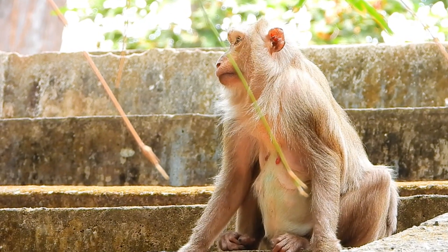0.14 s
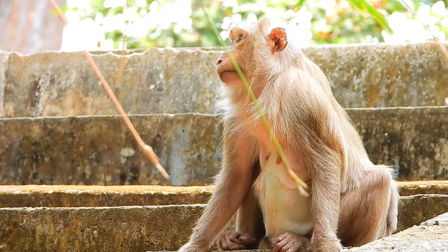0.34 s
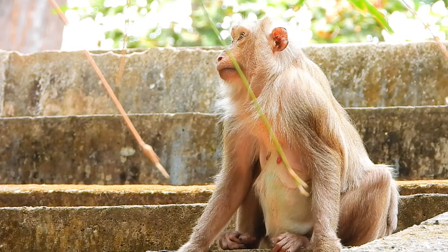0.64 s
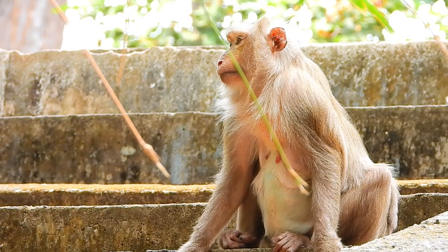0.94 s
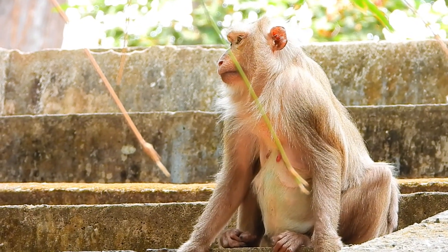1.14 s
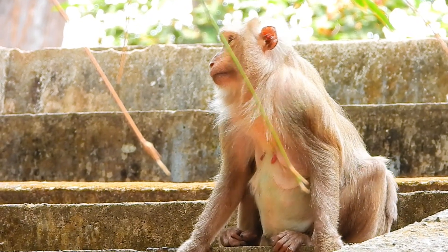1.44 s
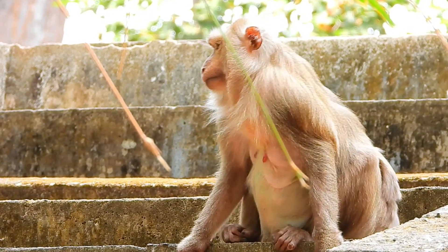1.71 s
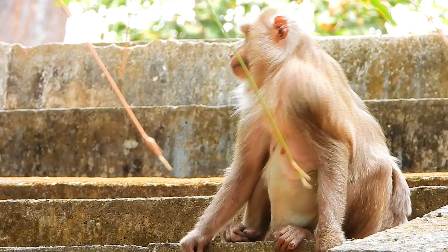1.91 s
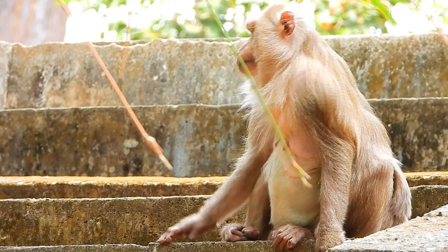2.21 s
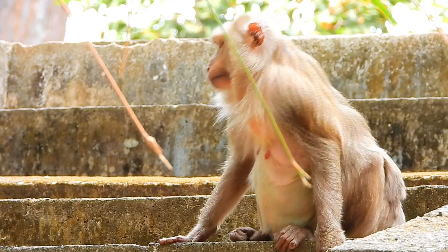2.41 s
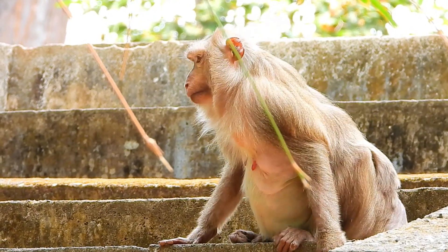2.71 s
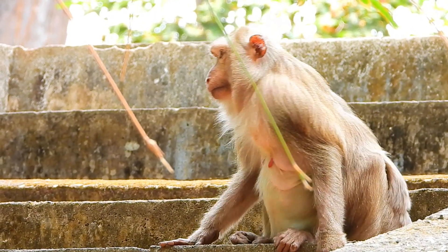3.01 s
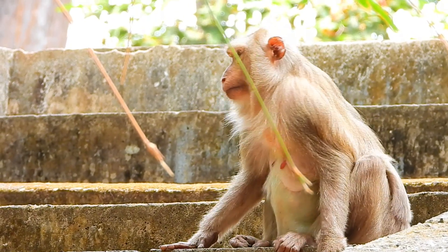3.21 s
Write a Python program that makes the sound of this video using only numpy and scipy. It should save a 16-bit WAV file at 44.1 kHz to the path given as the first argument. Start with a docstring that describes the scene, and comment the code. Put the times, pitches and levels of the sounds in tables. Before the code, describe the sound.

A dense cicada chorus drones steadily from 0 to about 3.35 seconds, already going at the start and cut off without an ending. Far insects merge into a wide, bright hiss; nearer ones buzz and flicker in quick small swells, smeared by foliage. A closer, drier rasp stays right. Underneath lie a faint outdoor wash and a very weak, wavering low hum that slowly fades. The monkey is silent.

```python
"""A dense chorus of cicadas drones in trees: flickering near voices, a fine rasp to the right, a broad hiss.
The nearer insects click their tymbals a few hundred times a second into ringing abdomens, smeared by foliage.
The closest is a regular, unsmeared click train; countless far insects are shaped, diffuse noise.
Beneath lie a faint outdoor wash of noise and a low, wavering hum of narrow noise bands."""
import sys
import numpy as np
from scipy import signal
from scipy.fft import rfft, irfft, next_fast_len
from scipy.io import wavfile
from scipy.ndimage import uniform_filter1d

SR = 44100
rng = np.random.default_rng(int(sys.argv[2]) if len(sys.argv) > 2 else 0)


def dump(signal):
    """Clip the signal to [-1, 1] and save it as 16-bit WAV at the path in sys.argv[1]."""
    limited = np.clip(np.atleast_2d(signal).T, -1, 1)
    pcm = np.round(limited * 32767).astype(np.int16)
    wavfile.write(sys.argv[1], SR, pcm)


N = 147735

# Body resonances of the nearer cicadas. Each row: centre in Hz, width in Hz (between -9 dB points),
# relative level in dB, left-right likeness from 0 to 1.
BODY_RINGS = [(1621, 330, -43.5, 0.96), (1758, 203, -37, 0.84), (1950, 190, -45, 0.74),
              (3149, 495, -35.5, 1), (3333, 310, -31.5, 0.48), (3493, 360, -30, 0.7), (3705, 300, -35.5, 1),
              (4264, 800, -34.5, 0.26), (5110, 940, -33, 0.23)]
# Limits between the low, main and high bands of those resonances, in Hz.
BAND_LIMITS_HZ = (2500, 3900)
# Swell of the main band. Each row: time in seconds, relative level in dB.
MAIN_SWELL = [(0.0, -28), (0.13, -26), (0.16, -31), (0.19, -25.5), (0.32, -28.5), (0.34, -23.5),
              (0.44, -29), (0.46, -23.5), (0.5, -28.5), (0.54, -25.5), (0.69, -28), (0.77, -25.5),
              (1.36, -26.5), (1.54, -25.5), (1.56, -29.5), (1.63, -24.5), (1.66, -28), (1.67, -21),
              (1.75, -27.5), (1.77, -24), (1.79, -26), (1.86, -23), (1.88, -30), (1.91, -24), (1.94, -29),
              (1.98, -23), (2.01, -27.5), (2.24, -25.5), (2.27, -29.5), (2.49, -23.5), (2.59, -28.5),
              (2.82, -23.5), (2.84, -26), (2.89, -25), (2.9, -29), (2.93, -25), (2.98, -26.5), (2.99, -36),
              (3.01, -25), (3.35, -26)]
# Swell of the low band. Each row: time in seconds, relative level in dB.
LOW_BAND_SWELL = [(0.0, -33), (0.17, -33), (0.24, -42), (0.26, -35.5), (0.54, -38), (0.56, -32),
                  (0.64, -40.5), (0.72, -33.5), (0.79, -38.5), (0.81, -30), (0.87, -42), (0.92, -33.5),
                  (1.3, -36), (1.31, -37.5), (1.51, -32.5), (1.58, -38), (1.63, -31), (1.64, -35.5),
                  (1.84, -36.5), (1.87, -26.5), (1.88, -45), (1.92, -33), (2.15, -37.5), (2.27, -33),
                  (2.38, -39.5), (2.47, -31), (2.57, -43), (2.62, -31.5), (2.71, -36.5), (2.75, -31),
                  (2.85, -42.5), (2.87, -30.5), (2.94, -39), (2.97, -32.5), (3.1, -37.5), (3.35, -33)]
# Ring of the closest cicada's clicks. Each row: centre in Hz, width in Hz (between -9 dB points),
# relative level in dB.
RASP_RINGS = [(3465, 1000, -0.5), (4300, 690, -3.5), (5250, 1800, -4.5)]
# Spectrum of the far chorus. Each row: frequency in Hz, relative density in dB per Hz.
FAR_SPECTRUM = [(900, -43), (1500, -4), (2000, -3), (2400, -6), (2850, -4.5), (3300, 4), (3980, -2),
                (4600, 2), (5700, 0.5), (6200, -.5), (6750, 0), (7200, -5), (8300, -9), (9000, -13.5),
                (10800, -16.5), (12500, -22.5), (13300, -29.5), (14500, -43)]
# Change of the highest hiss. Each row: time in seconds, change in dB.
FIZZ_CHANGE = [(0, 0), (1.5, -1), (2.6, -1), (2.9, -0.5), (3.15, 1), (3.35, 1)]
# Spectrum of the outdoor wash. Each row: frequency in Hz, relative density in dB per Hz.
WASH_SPECTRUM = [(20, -39), (50, -36), (70, -26), (90, -21), (135, -14), (165, -7), (200, 9), (235, 1),
                 (268, -23), (300, -3.5), (390, -2), (520, -.5), (730, 0.5), (1250, -1.8), (2500, -9),
                 (6000, -41)]
# Swell of the outdoor wash. Each row: time in seconds, relative level in dB.
WASH_LEVEL = [(0, -48.5), (.5, -46), (.65, -48), (.9, -45.5), (1.07, -50), (1.3, -45.5), (1.7, -46.5),
              (2.15, -44.5), (2.4, -46.5), (2.8, -46.5), (3.05, -45.5), (3.35, -45.5)]
# Stereo likeness of distant sound. Each row: frequency in Hz, likeness from -1 to 1.
LIKENESS = [(30, 0.077), (170, .93), (500, 0.84), (1200, 0.72), (1800, 0.53), (2500, 0.56), (3500, -0.009),
            (4300, 0.3), (5500, 0.14), (7000, -0.098), (10000, -0.067), (13000, -0.00059)]
# Low hum. Each row: centre in Hz, width in Hz (between -9 dB points), starting level in dB, change in dB per second.
HUM_BANDS = [(106, 20, -69, -3.5), (160.8, 10.2, -58, -0.86), (295.7, 38, -56, -5)]

# spread and jitter are in log rate: the rates span +-2 * spread
CLICK_HZ, CLICK_LOG_SPREAD, CLICK_LOG_JITTER = 310.7, 0.13, 0.09
THROB_RMS_DB, THROB_HZ = 1.37, 19
SCATTER_T60_S, DIRECT_GAIN = 0.27, 0.5
RASP_HZ, RASP_WAVER_SHARE, RASP_DB = 311, 0.003, -37
FAR_DB, FIZZ_MID_HZ = -28.5, 7800
WASH_DB = -44
NEAR_RIGHT_DB, RASP_RIGHT_DB, FAR_RIGHT_DB = 1.1, 6.0, 0.5  # right over left
LOWPASS_HZ = 14700


def near_cicadas(count=16):
    """Each insect sends a throbbing train of clicks through the foliage and its body resonances."""
    size = next_fast_len(N, True)
    f = np.fft.rfftfreq(size, 1 / SR)
    bands = np.zeros((3, 2, len(f)), complex)
    rings = [evened(abs(resonance(f, hz, width_hz))) * gain_of(db)
             for hz, width_hz, db, same in BODY_RINGS]
    for place in np.linspace(-1, 1, count):
        unsteady = evened(uniform_filter1d(rng.standard_normal(N), size=200))
        rate_hz = CLICK_HZ * np.exp(2 * CLICK_LOG_SPREAD * place + CLICK_LOG_JITTER * unsteady)
        # one click per whole cycle
        cycles = np.cumsum(rate_hz) / SR + rng.random()
        clicks = np.diff(np.floor(cycles), prepend=0)
        clicks = clicks * gain_of(THROB_RMS_DB * drift(THROB_HZ))
        clicks = evened(clicks - clicks.mean())
        paths = rfft(np.resize(clicks, size)) * rfft(foliage(), size)
        for ring, (hz, width_hz, db, same) in zip(rings, BODY_RINGS):
            phase = np.exp(2j * np.pi * rng.random())
            bands[np.searchsorted(BAND_LIMITS_HZ, hz)] += pair(*paths, same) * ring * phase
    low, main, high = irfft(bands, size)[..., :N] / np.sqrt(count)
    low = shimmer(low, depth_db=4.5, span_s=0.041, span_hz=26.2)
    low = interwoven(low, span_s=0.071) * level(LOW_BAND_SWELL)
    main = shimmer(main, depth_db=3.5, span_s=0.043, span_hz=26.6)
    main = interwoven(main, span_s=0.058) * level(MAIN_SWELL)
    return leaning(low + main + high, NEAR_RIGHT_DB)


def foliage(size=8192):
    """Two unrelated decaying tails of scatter from the leaves, the first with a direct path."""
    decay = gain_of(-60 * np.arange(size) / SR / SCATTER_T60_S)
    tail = rng.standard_normal((2, size)) * decay
    tail /= np.linalg.norm(tail, axis=1, keepdims=True)
    tail[0, 0] += DIRECT_GAIN
    return tail / np.linalg.norm(tail, axis=1, keepdims=True)


def closest_cicada():
    """One insect's regular clicks excite its resonances and arrive unsmeared, as a fine rasp."""
    f = np.fft.rfftfreq(N, 1 / SR)
    cycles = np.cumsum(RASP_HZ * (1 + RASP_WAVER_SHARE * drift(hz=5))) / SR
    clicks = rfft(np.diff(np.floor(cycles), prepend=0))
    rasp = np.zeros(N)
    for hz, width_hz, db in RASP_RINGS:
        ring = evened(irfft(clicks * resonance(f, hz, width_hz), N))
        rasp += gain_of(db) * ring * gain_of(2.3 * drift(hz=20))
    # the phase steps at random from click to click
    slip = np.cumsum(rng.standard_normal(int(cycles[-1]) + 1))[cycles.astype(int)]
    rasp = (signal.hilbert(rasp) * np.exp(0.7j * slip)).real
    return leaning(gain_of(RASP_DB) * evened(rasp), RASP_RIGHT_DB)


def far_cicadas():
    """Countless far insects merge into a gently wavering hiss of shaped noise."""
    hiss = distant(FAR_SPECTRUM, patchy_db=0.3, fizz=1.0)
    hiss = shimmer(hiss, depth_db=2.0, span_s=0.019, span_hz=49.6, size=2048)
    return leaning(hiss * gain_of(FAR_DB + 0.12 * drift(hz=8.2)), FAR_RIGHT_DB)


def outdoor_wash():
    """Faint diffuse noise whose strands flicker under a slow swell."""
    wash = distant(WASH_SPECTRUM, patchy_db=0.44)
    wash = shimmer(wash, depth_db=3.5, span_s=0.023, span_hz=30.6, size=2048)
    wash = shimmer(wash, depth_db=2.5, span_s=0.058, span_hz=85, size=2048)
    return gain_of(WASH_DB) * interwoven(wash, span_s=0.11) * level(WASH_LEVEL)


def hum():
    """Narrow bands of noise make low tones that waver and slowly fade."""
    f, t = np.fft.rfftfreq(N, 1 / SR), np.arange(N) / SR
    total = np.zeros(N)
    for hz, width_hz, db, db_per_s in HUM_BANDS:
        noise = rfft(rng.standard_normal(N))
        tone = evened(irfft(noise * resonance(f, hz, width_hz), N))
        total += gain_of(db + db_per_s * t) * tone
    return total


def distant(spectrum, patchy_db, fizz=0, size=1024):
    """Diffuse stereo noise of rms 1 with drifting patches of loudness."""
    hop = size // 4
    t, hz = np.arange(N // hop + 5) * hop / SR, np.fft.rfftfreq(size, 1 / SR)
    a, b, c, d, patches = rng.standard_normal((len(t), len(hz), 5)).T
    patches = uniform_filter1d(patches, size=10, axis=0)
    patches = evened(uniform_filter1d(patches, size=16, axis=1))
    # fizz fades in from 0.75 to 1.25 times its middle frequency
    high = np.clip(2 * (hz / FIZZ_MID_HZ - 1) + 0.5, 0, 1)[:, None]
    field_db = read(spectrum, hz)[:, None] + patchy_db * patches
    field_db = field_db + fizz * high * np.interp(t, *np.transpose(FIZZ_CHANGE))
    z = pair(a + 1j * b, c + 1j * d, read(LIKENESS, hz)[:, None]) * gain_of(field_db)
    return evened(signal.istft(z, nperseg=size, noverlap=size - hop)[1][:, :N])


def shimmer(x, depth_db, span_s, span_hz, size=4096):
    """Narrow strands of the sound swell and fade by chance; the overall level stays."""
    overlap = size - size // 4
    hz, t, z = signal.stft(x, SR, nperseg=size, noverlap=overlap, boundary="even")
    near_t = np.exp(-((t[:, None] - t) / span_s) ** 2)
    near_hz = np.exp(-(hz[:40] - hz[20]) ** 2 / span_hz ** 2)
    chance = near_t @ rng.standard_normal((len(t), len(hz)))
    patches = evened(signal.fftconvolve(chance, near_hz[None], "same"))
    y = signal.istft(z * gain_of(depth_db * patches.T), nperseg=size, noverlap=overlap)[1][:, :N]
    return evened(y) * x.std()


def interwoven(x, span_s):
    """Strands take over from one another: dividing by smoothed power evens the summed level."""
    span = int(span_s * SR) + 1
    power = uniform_filter1d(uniform_filter1d((x ** 2).mean(0), span), span)
    return evened(x / np.sqrt(abs(power) + 1e-20)) * x.std()


def level(points):
    """Gain over time from a curve in dB, scaled to mean power 1."""
    return evened(gain_of(np.interp(np.arange(N) / SR, *np.transpose(points))))


def drift(hz):
    """Slow chance of rms 1: sines of random phase up to about hz."""
    t = np.linspace(0, N / SR, 1500)
    rates_hz = hz * np.geomspace(0.1, 1, 20) * rng.uniform(0.9, 1.1, 20)
    slow = sum(np.sin(2 * np.pi * (f * t + rng.random())) for f in rates_hz)
    return np.interp(np.arange(N) / SR, t, evened(slow))


def resonance(f, hz, width_hz):
    """Complex gain of a steep-sided resonance at the frequencies f."""
    return 1 / (1 + 2j * (f - hz) / width_hz) ** 3


def pair(a, b, same):
    """Two unrelated signals become left and right with the given likeness."""
    turn = np.arccos(np.clip(same, -1, 1)) / 2
    mid, side = np.cos(turn) * a, np.sin(turn) * b
    return np.array([mid + side, mid - side])


def leaning(x, right_db):
    """Tips a sound to the right by a level difference."""
    return x * gain_of([[-right_db / 2], [right_db / 2]])


def read(points, hz):
    """Reads a table on a log-frequency axis."""
    f, value = np.transpose(points)
    return np.interp(np.log(hz + 1), np.log(f + 1), value)


def gain_of(db):
    """Decibels to gain."""
    return 10 ** (np.asarray(db) / 20)


def evened(x):
    """Scales to rms 1."""
    return x / np.sqrt(np.mean(x ** 2) + 1e-20)


def scene():
    """Near, closest and far cicadas over the outdoor wash and hum."""
    return near_cicadas() + closest_cicada() + far_cicadas() + outdoor_wash() + hum()


def record(dry):
    """Limits the band with a steep low-pass."""
    lowpass = signal.firwin(511, LOWPASS_HZ, window=("kaiser", 9), fs=SR)
    return signal.oaconvolve(dry, lowpass[None], "same")


dry = scene()
out = record(dry)
dump(out)
```